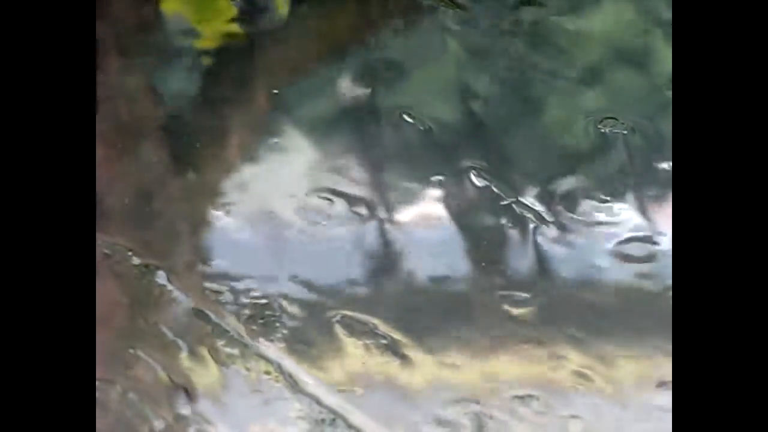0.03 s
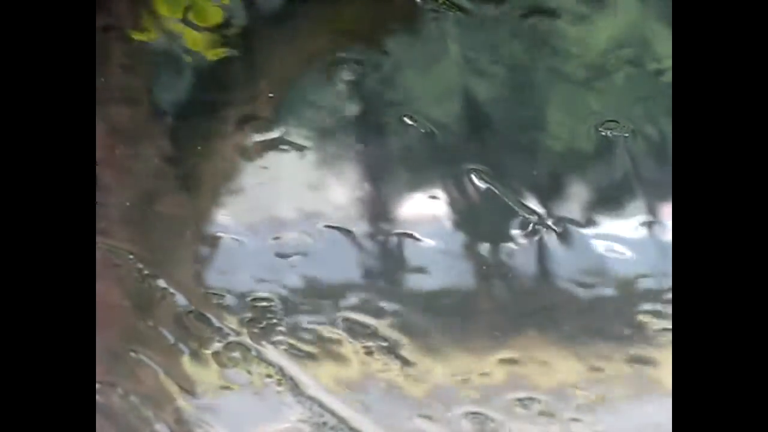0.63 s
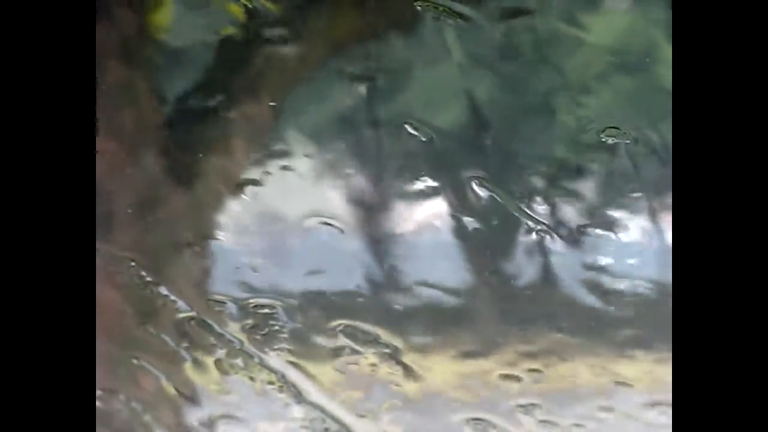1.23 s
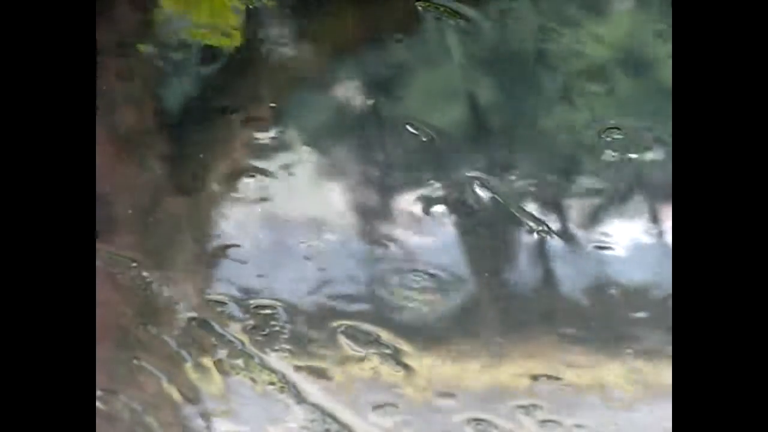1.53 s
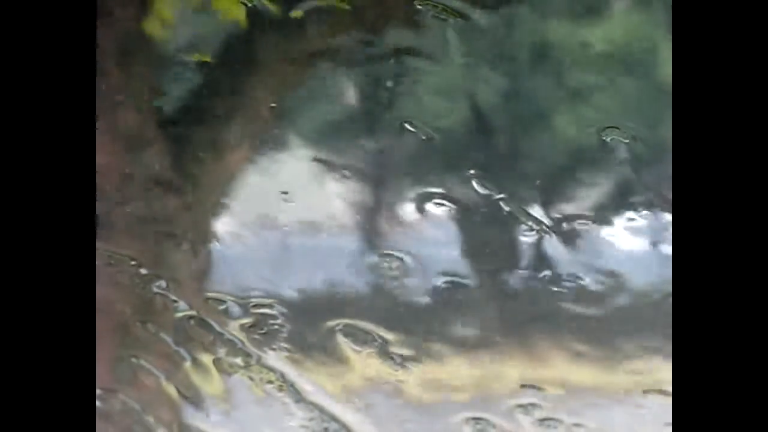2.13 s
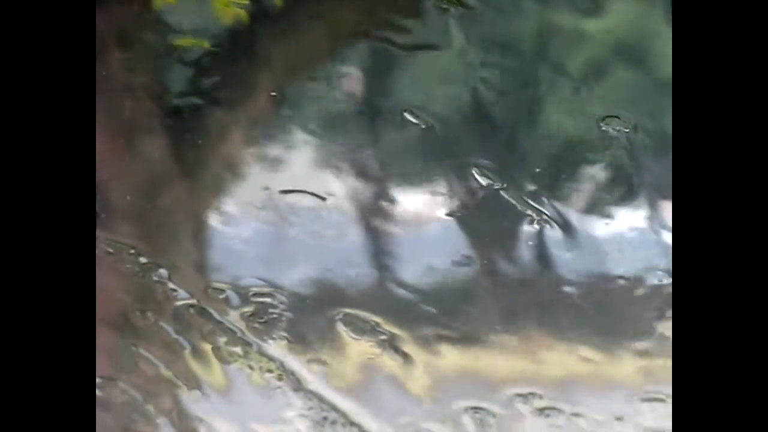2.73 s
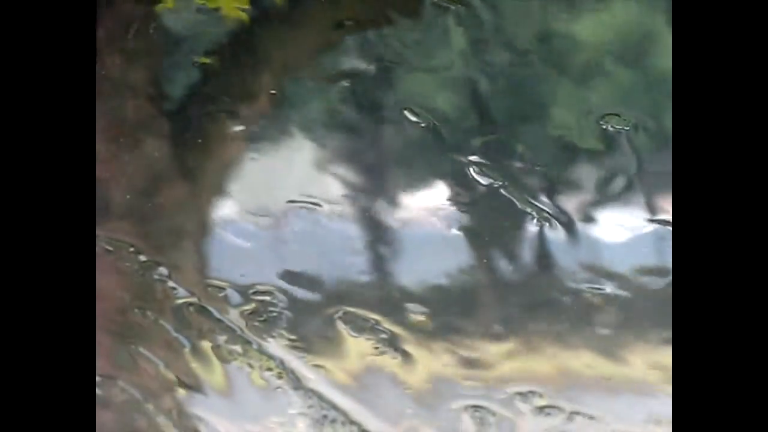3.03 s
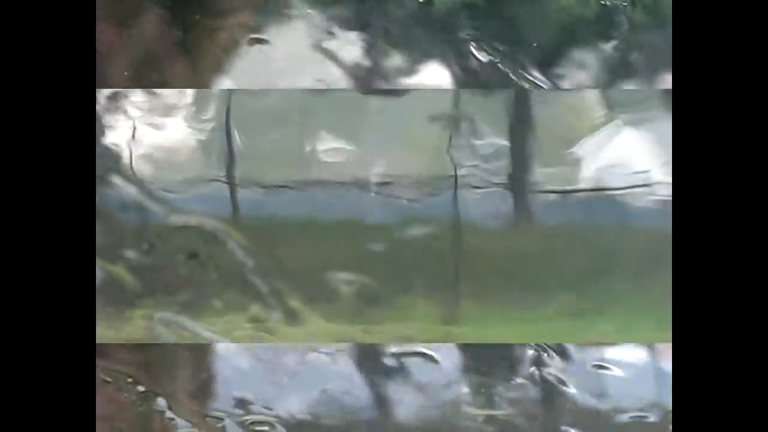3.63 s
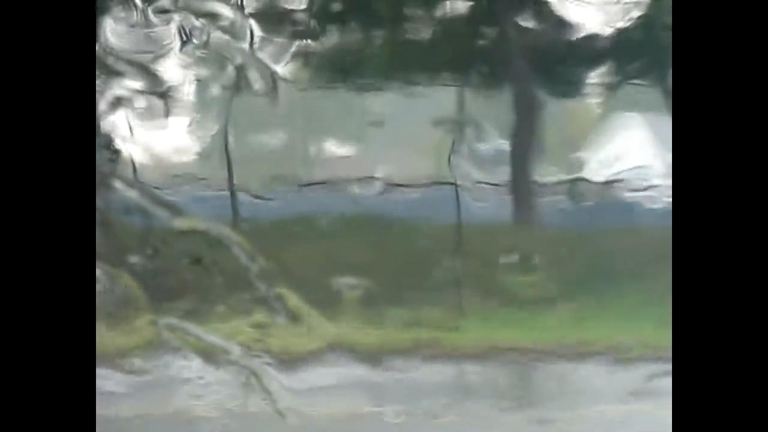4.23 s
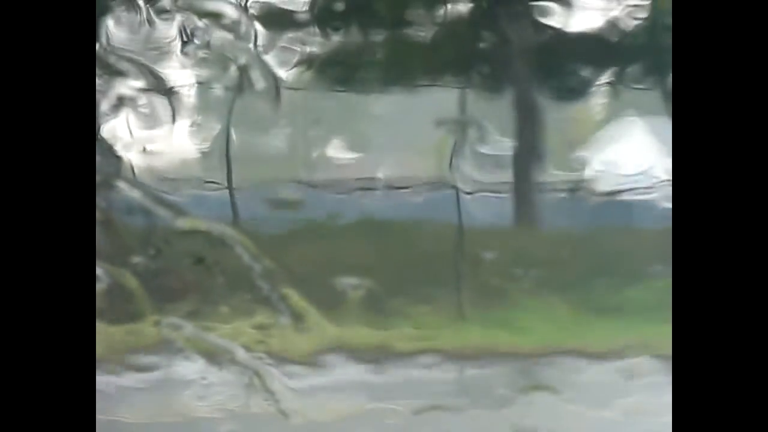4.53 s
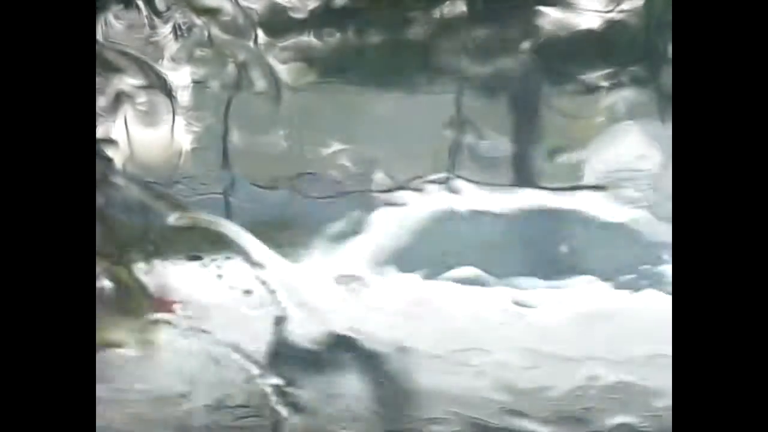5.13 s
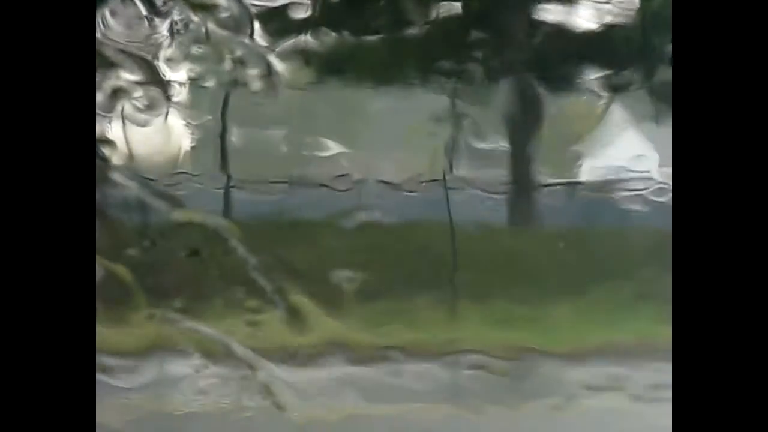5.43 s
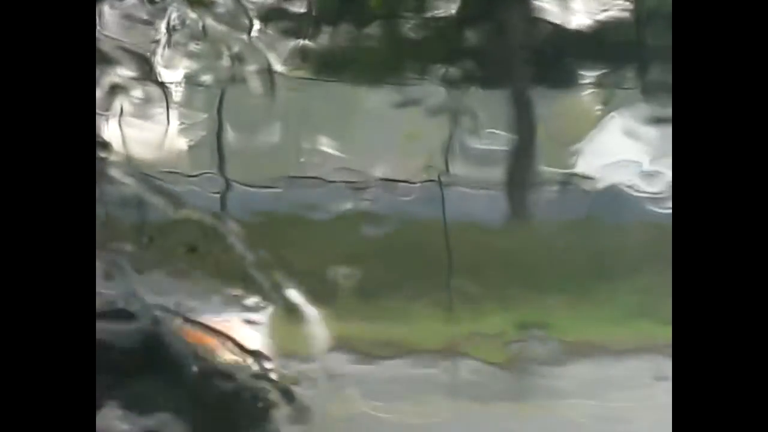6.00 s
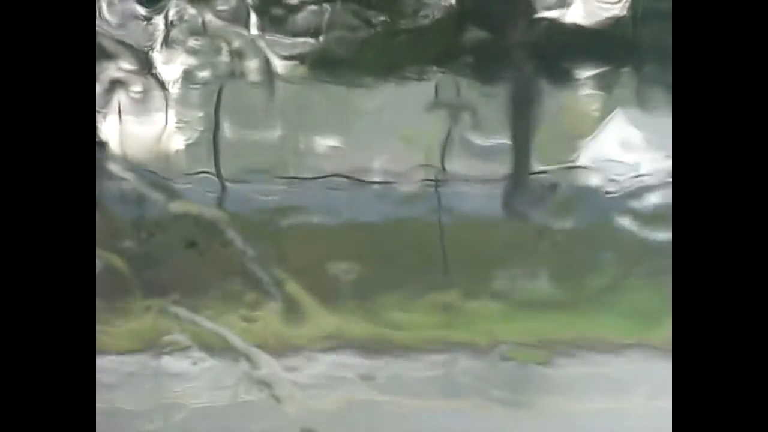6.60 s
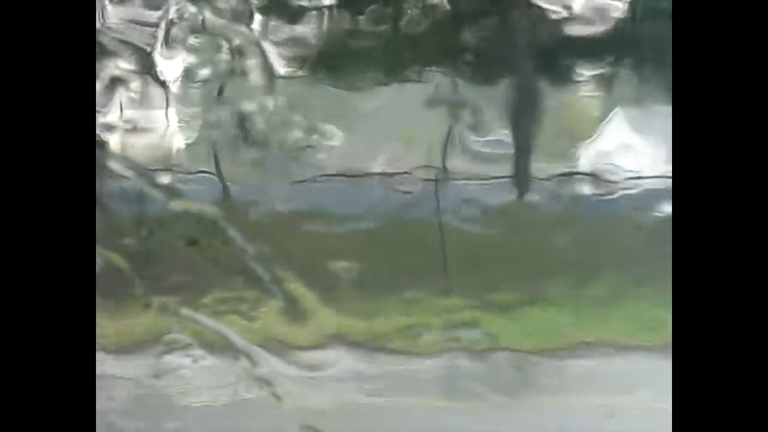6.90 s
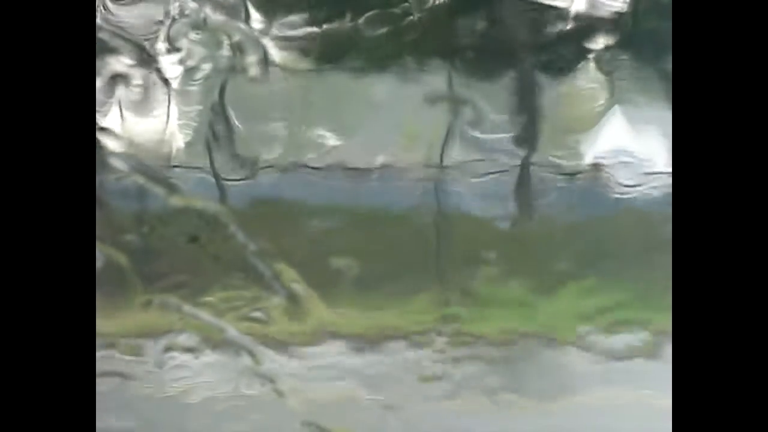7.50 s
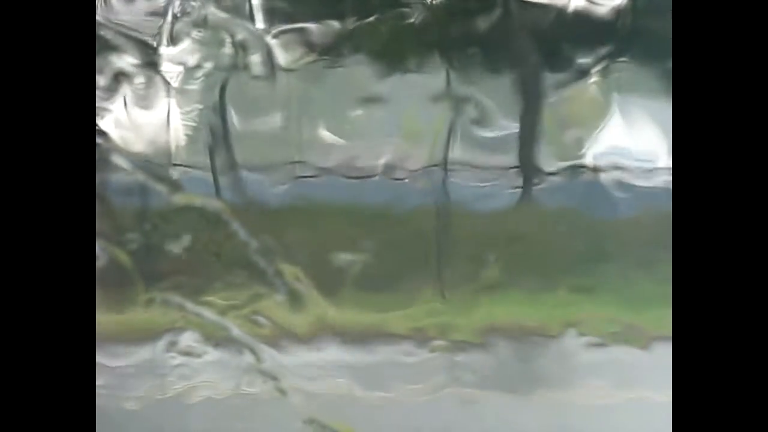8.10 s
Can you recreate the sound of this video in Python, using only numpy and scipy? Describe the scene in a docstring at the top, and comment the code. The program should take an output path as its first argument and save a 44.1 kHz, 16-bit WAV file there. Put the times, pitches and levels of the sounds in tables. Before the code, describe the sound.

Heavy rain heard from inside a car gives way, after a brief silence, to lighter patter over a faint traffic rumble.

```python
"""Rain inside a parked car

One microphone in the cabin, beside a wet road. Drops drum on the roof overhead, tick on the near glass
and set the cabin ringing; a few fat drips knock through. At 4 s the downpour gives way abruptly to
lighter rain, with a brief silence. Outside, passing cars hum, rumble and make the cabin boom."""
import sys
import numpy as np
from scipy import signal
from scipy.fft import rfft, irfft
from scipy.io import wavfile

SR = 44100
rng = np.random.default_rng(int(sys.argv[2]) if len(sys.argv) > 2 else 0)


def generate_wav(sig):
    """Save sig (samples, or channels by samples) to the path in sys.argv[1] as 16-bit PCM at SR."""
    pcm = np.round(np.clip(np.atleast_2d(sig).T, -1, 1) * 32767).astype(np.int16)
    wavfile.write(sys.argv[1], SR, pcm)


N = 368235
TIME = np.arange(N) / SR
RAIN_EASES_S = 3.996


def from_db(db):
    """Decibels to gain."""
    return 10 ** (np.asarray(db) / 20)


def rms_one(x):
    """Scale to unit rms."""
    return x / np.sqrt(np.mean(x ** 2) + 1e-20)


def gains_in_time(rows):
    """Each dB column of a curve as a gain per sample."""
    times, *columns = np.transpose(rows)
    return [from_db(np.interp(TIME, times, db)) for db in columns]


def drift(rate):
    """Slow random wander with spread 1, changing about `rate` times a second."""
    hop, run_in = 40, 2000
    pole = np.exp(-2 * np.pi * rate * hop / SR)
    noise = rng.standard_normal(N // hop + run_in + 2)
    slow = signal.lfilter([1], [1, -2 * pole, pole * pole], noise)[run_in:]
    return np.interp(np.arange(N) / hop, np.arange(len(slow)), rms_one(slow))


def colour(x, spectrum, size=8192):
    """Minimum-phase filter with the given spectrum: sharp attack, then the ring; rms 1."""
    hz, db = np.transpose(spectrum)
    grid_hz = np.maximum(np.arange(size // 2 + 1) * SR / size, 1)
    gain = from_db(np.interp(np.log(grid_hz), np.log(hz), db))
    cepstrum = irfft(np.log(gain))
    log_response = rfft(2 * cepstrum[1:size // 2], size) * np.exp(-2j * np.pi * grid_hz / SR)
    impulse_response = irfft(np.exp(log_response))
    return rms_one(signal.fftconvolve(x, impulse_response)[:N])


def impacts(per_s, spread_db, flurry_db):
    """Drops land at random, in flurries; most are small and a few are large."""
    lands = rng.random(N) < per_s * from_db(flurry_db * drift(14)) / SR
    sizes = from_db(spread_db * np.minimum(rng.exponential(1, N), 3.5))
    return rms_one(lands * sizes * rng.choice([-1, 1], N))


def rain(levels, roof_spectrum, roof_per_s, glass_per_s, roof_db, glass_db):
    """Dense dull drumming overhead and sparser, brighter ticks on the near glass: (roof, glass)."""
    # a drop's splash on the glass: (frequency [Hz], relative level [dB])
    glass_spectrum = [(500, -1), (1500, -1.5), (3000, 4.5), (4000, 0.5), (5300, -9), (7200, -10),
                      (8600, -14.5), (10300, -26), (11500, -34), (13500, -20), (16000, -25.5)]
    drumming, patter = gains_in_time(levels)
    on_roof = impacts(roof_per_s, spread_db=3.0, flurry_db=1.13)
    on_glass = impacts(glass_per_s, spread_db=2.5, flurry_db=1.42)
    # a drop on the glass also shakes the body
    body = colour(on_roof + from_db(-9.5) * on_glass, roof_spectrum)
    ticks = colour(on_glass, glass_spectrum)
    return from_db(roof_db) * drumming * body, from_db(glass_db) * patter * ticks


def surges(rows, attack_s, decay_s):
    """Gain of a rain layer: each load of water lifts it quickly, then drains away."""
    lift_db = 0
    for start, db in rows:
        attack = np.clip((TIME - start) / attack_s, 0, 1)
        drain = np.exp(-np.maximum(TIME - start - attack_s, 0) / decay_s)
        lift_db += db * attack * drain
    return from_db(lift_db)


def shower():
    """Heavy rain on the car, then lighter rain, both a little unsteady."""
    # slow swell of each rain: (time [s], roof level before trim [dB], glass level before trim [dB])
    heavy_swell = [(0, -32, -45), (1.2, -30.5, -45), (1.55, -30.5, -44.5), (1.8, -29.3, -42.7),
                   (2.15, -29, -43), (2.7, -29.5, -45.5), (3.25, -31, -47), (3.6, -31.5, -48.5),
                   (4, -33.5, -49.5)]
    light_swell = [(4.3, -39, -52.5), (4.6, -36.5, -49.7), (5.25, -40, -53), (5.45, -38.5, -51.5),
                   (5.95, -38.5, -52), (6.5, -36.6, -49.5), (6.95, -37, -49), (7.4, -35, -47.7),
                   (7.9, -37.5, -49.3), (8.35, -36, -48)]
    # the roof's answer to a drop in each rain: (frequency [Hz], relative level [dB])
    heavy_roof = [(53, -52.5), (90, -21), (124, -10), (251, -8.5), (334, -2.5), (402, -0.5), (562, -4.5),
                  (711, -4), (1590, -6.5), (1730, -5.5), (5000, -27), (6500, -43), (11000, -120)]
    light_roof = [(53, -31), (90, -14.5), (157, -5), (264, -9), (340, -0.5), (508, -1), (562, -5),
                  (612, -3), (1590, -4.5), (1730, -4), (2120, -7), (5000, -32), (6500, -77), (11000, -120)]
    # handfuls of water shaken from the trees onto the roof: (time [s], rise [dB])
    splatters = [(0.45, 3.5), (1.75, 0.5), (3.285, 3), (3.39, 2.5), (6.57, 3)]
    # large drops bursting into droplets on the glass: (time [s], rise [dB])
    splashes = [(0.688, 4), (4.487, 6), (5.135, 4), (5.355, 5), (5.458, 5), (5.868, 6), (6.458, 6),
                (6.495, 5), (7.278, 3)]
    heavy = rain(heavy_swell, heavy_roof, roof_per_s=7000, glass_per_s=4000, roof_db=-1.0, glass_db=5.5)
    light = rain(light_swell, light_roof, roof_per_s=6500, glass_per_s=3000, roof_db=-1.5, glass_db=3.5)
    roof, glass = np.where(TIME < RAIN_EASES_S, heavy, light)
    roof *= surges(splatters, attack_s=0.02, decay_s=0.082)
    glass *= surges(splashes, attack_s=0.003, decay_s=0.013)
    gust_db = 0.17 * drift(4)
    return (roof + glass) * from_db(gust_db)


def cabin(x):
    """Panels and enclosed air around the microphone lift some pitches and swallow others."""
    # resonances and hollows: (frequency [Hz], width [Hz], gain [dB])
    resonances = [(124.6, 15, 4.5), (176, 40, 4.5), (257, 87, -3.5), (336, 39, 3.5), (388, 40, 1.5),
                  (500, 75, 2.5), (576, 35, -2.5), (711, 27, 3), (885, 30, -0.5), (1124, 150, 2),
                  (1383, 27, 3), (1530, 40, 2), (1593, 48, 2.5), (1740, 100, -5), (2140, 80, 1.5),
                  (2590, 130, 3)]
    for hz, width_hz, db in resonances:
        b, a = signal.iirpeak(hz, hz / width_hz, fs=SR)
        x = x + (from_db(db) - 1) * signal.lfilter(b, a, x)
    return x


def far_road(level_db):
    """A steady bed of distant road noise and hiss."""
    # tone of the bed: (frequency [Hz], relative level [dB])
    spectrum = [(15, 4), (28, -13), (40, -7), (78, -1.5), (130, -5), (260, -7.5), (1000, -9), (4000, -22.5),
                (10000, -33), (16000, -33.5)]
    return from_db(level_db) * colour(rng.standard_normal(N), spectrum)


def passing():
    """Strength of the passing cars: each swells and fades as one over its distance."""
    # cars going by: (time when nearest [s], tyre rumble [dB], half-length [s])
    cars = [(.55, -52, .4), (2.0, -55, .35), (3.45, -50, .35), (5.25, -55, .35), (6.2, -48.5, .45),
            (8.1, -52.5, 0.23)]
    power = sum(from_db(db) ** 2 / (1 + ((TIME - nearest) / half_s) ** 2) for nearest, db, half_s in cars)
    return np.sqrt(power)


def boom(hz, width_hz, far_db, over_tyres_db):
    """Far traffic keeps the cabin's lowest air mode booming; a near car drives it harder."""
    level = np.hypot(from_db(far_db), from_db(over_tyres_db) * passing())
    b, a = signal.iirpeak(hz, hz / width_hz, fs=SR)
    air_mode = signal.lfilter(b, a, rng.standard_normal(N + SR))[SR:]
    return level * rms_one(air_mode)


def tyres():
    """Tyres rumble on the wet road as each car goes by."""
    # tyre noise muffled by the body: (frequency [Hz], relative level [dB])
    spectrum = [(30, -22.5), (70, -5.5), (110, -1.5), (150, 6), (200, -8.5), (270, -23), (1000, -36),
                (8000, -67)]
    return passing() * colour(rng.standard_normal(N), spectrum)


def engines(waver_hz):
    """Only each engine's firing tone reaches the microphone: it swells, glides and fades."""
    # engines going by: (start [s], end [s], first pitch [Hz], last pitch [Hz], peak [dB])
    passes = [(-.3, 1.1, 130.1, 126, -45.5), (.85, 1.33, 62, 58.6, -45), (1.55, 2.2, 60.2, 56.2, -45),
              (1.85, 2.45, 109.2, 136.5, -45.5), (2.25, 2.9, 52.4, 42, -47), (3.7, 4.63, 56.2, 57.6, -46.5),
              (4.8, 5.55, 60, 52, -49), (5.85, 6.9, 55.55, 54.6, -44)]
    hum = np.zeros(N)
    for start, end, first_hz, last_hz, db in passes:
        progress = np.clip((TIME - start) / (end - start), 0, 1)
        hz = first_hz + (last_hz - first_hz) * progress + waver_hz * drift(5.2)
        swell = from_db(db) * np.sin(np.pi * progress)
        hum += swell * np.sin(2 * np.pi * np.cumsum(hz) / SR)
    return hum


def drips():
    """Fat drips fall from the trees onto the car: each a short damped knock."""
    # single drips: (time [s], level [dB], pitch [Hz], time to fall 60 dB [s])
    hits = [(3.294, -15, 1150, 0.0053), (3.3055, -22, 750, 0.011), (3.5757, -10.5, 1010, 0.0061),
            (3.7190, -17, 1750, 0.0082), (4.498, -29, 1500, .006), (7.801, -27, 1700, 0.0055)]
    knocks = np.zeros(N)
    for start, db, hz, t60 in hits:
        age = np.maximum(np.arange(N) - round(start * SR), 0) / SR
        knocks += from_db(db - 60 * age / t60) * np.sin(2 * np.pi * hz * age)
    return knocks


def spray(start_s, level_db):
    """The smallest droplets fizz on the near glass in the last moments of the downpour."""
    # fine, bright spray: (frequency [Hz], relative level [dB])
    spectrum = [(1000, -21), (6000, -10), (8800, 0.5), (10500, -7.5), (13000, -6), (16000, -14)]
    fizz = colour(impacts(per_s=9030, spread_db=2.0, flurry_db=2.5), spectrum)
    return from_db(level_db) * fizz * (TIME > start_s) * (TIME < RAIN_EASES_S)


def scene():
    """From inside the car, in mono: rain close all round, the road muffled beyond."""
    rainfall = cabin(shower())
    bed = far_road(level_db=-46.5)
    traffic = boom(hz=57, width_hz=9.9, far_db=-52.5, over_tyres_db=-4) + tyres() + engines(waver_hz=1.2)
    return (rainfall + drips() + spray(start_s=3.3, level_db=-60.5) + traffic + bed)[None]


def record(dry):
    """The sound drops out for a fifth of a second; the highest treble is cut."""
    silent_from_s, silent_to_s, cutoff_hz = 4.095, 4.294, 15750
    live = (TIME < silent_from_s) | (TIME > silent_to_s)
    lowpass = signal.ellip(12, 0.1, 80, cutoff_hz, fs=SR, output="sos")
    return signal.sosfilt(lowpass, dry * live)


dry = scene()
out = record(dry)
generate_wav(out)
```